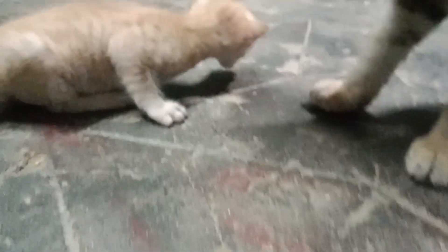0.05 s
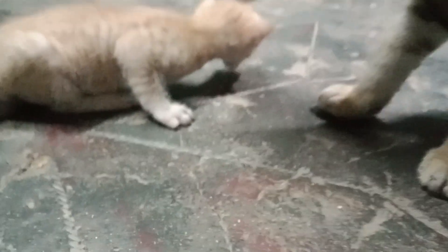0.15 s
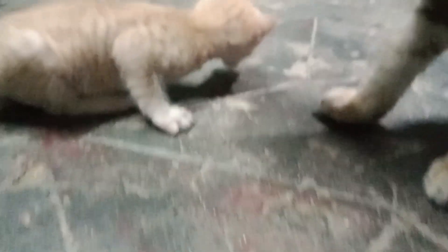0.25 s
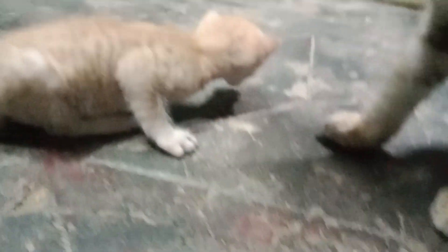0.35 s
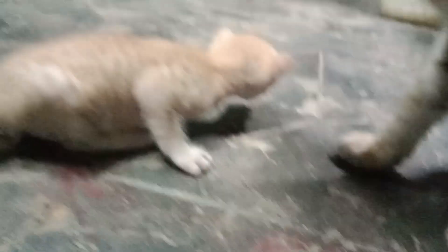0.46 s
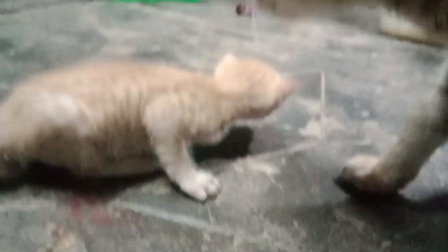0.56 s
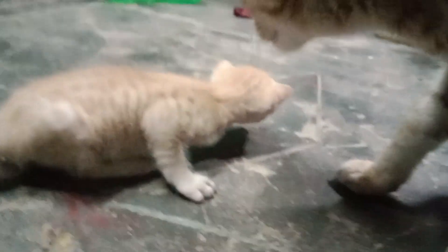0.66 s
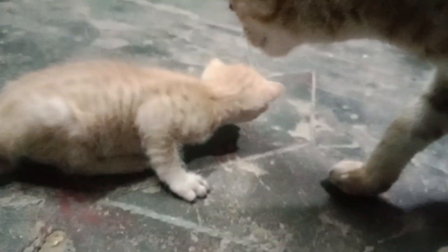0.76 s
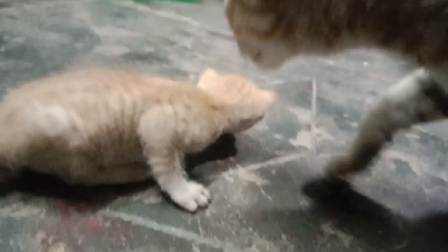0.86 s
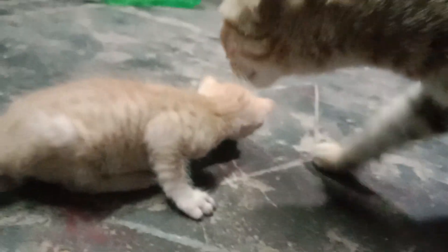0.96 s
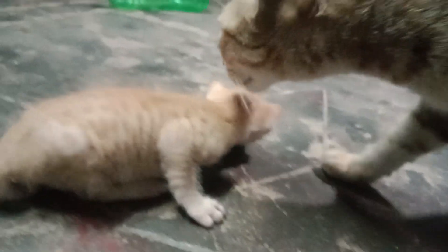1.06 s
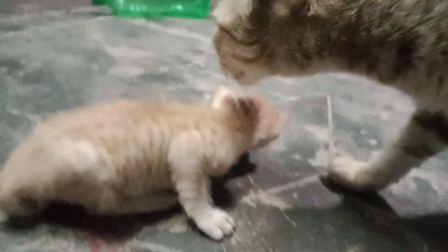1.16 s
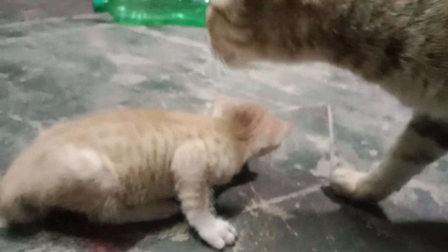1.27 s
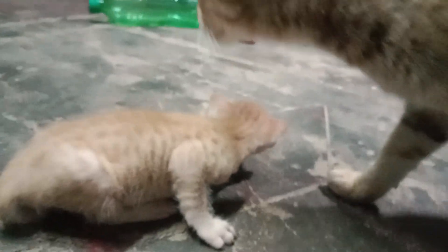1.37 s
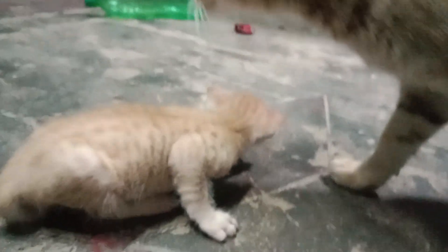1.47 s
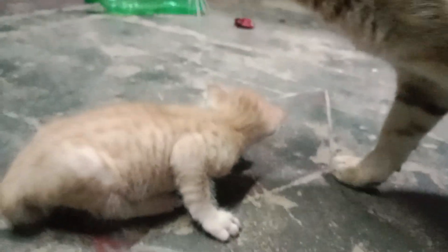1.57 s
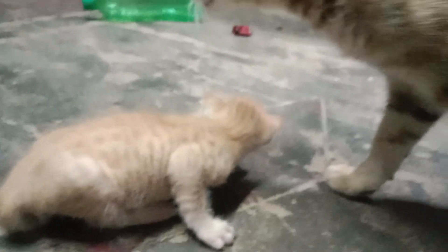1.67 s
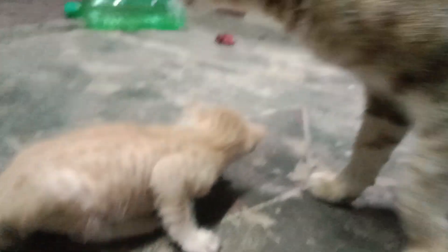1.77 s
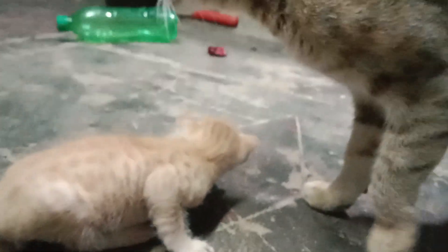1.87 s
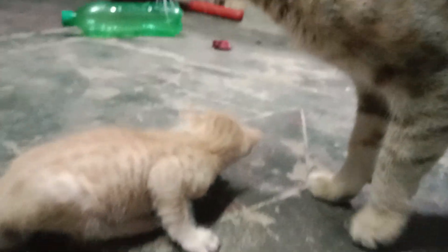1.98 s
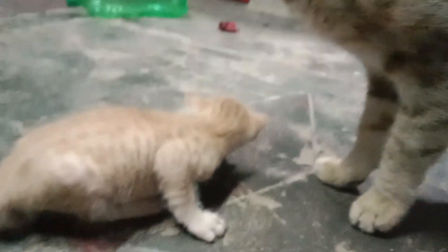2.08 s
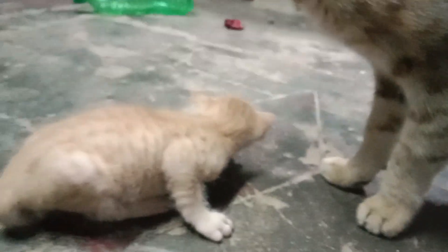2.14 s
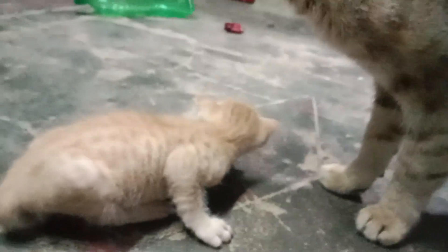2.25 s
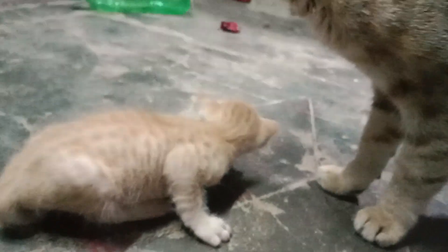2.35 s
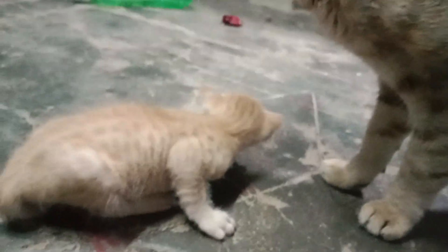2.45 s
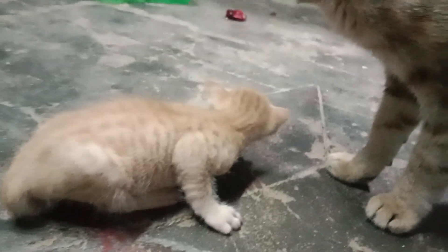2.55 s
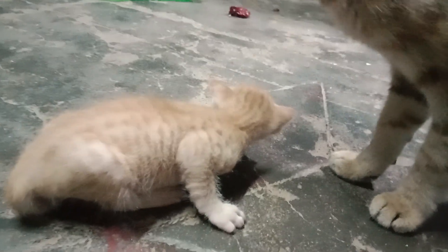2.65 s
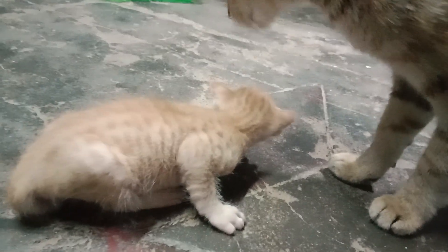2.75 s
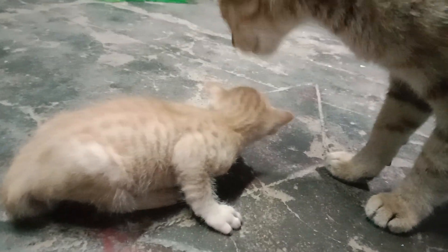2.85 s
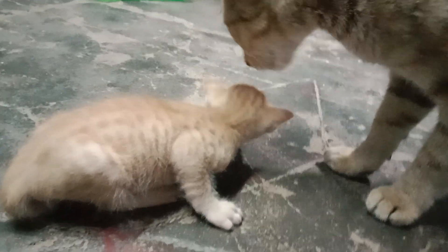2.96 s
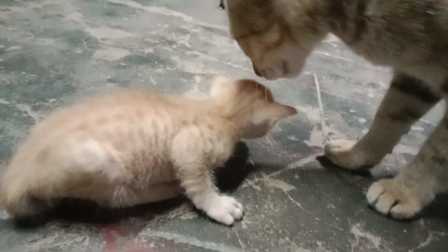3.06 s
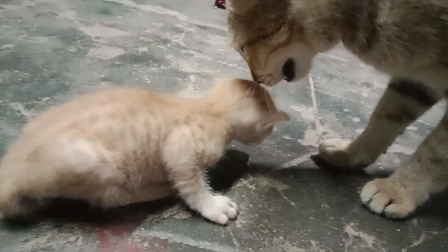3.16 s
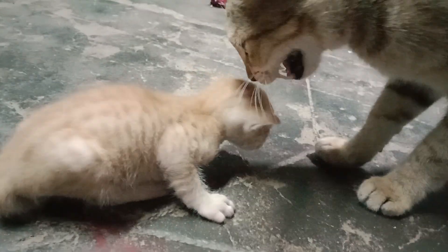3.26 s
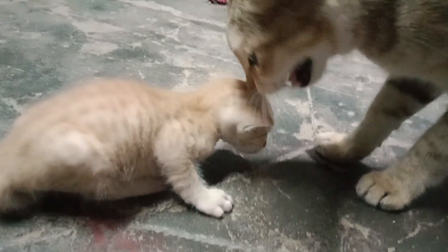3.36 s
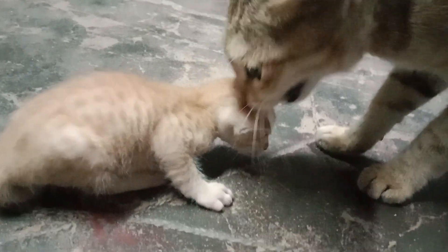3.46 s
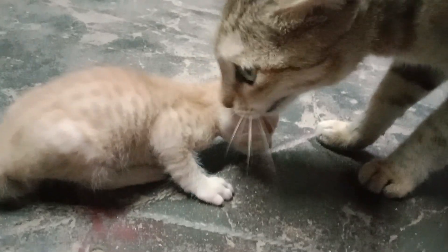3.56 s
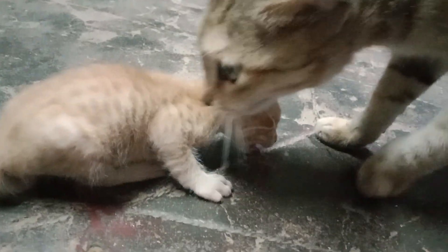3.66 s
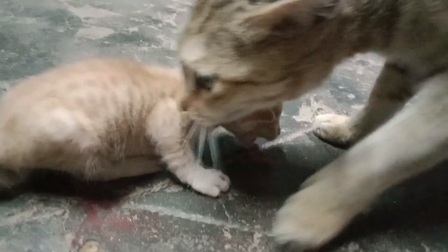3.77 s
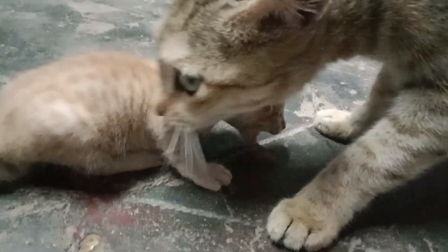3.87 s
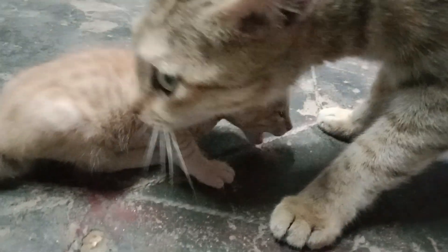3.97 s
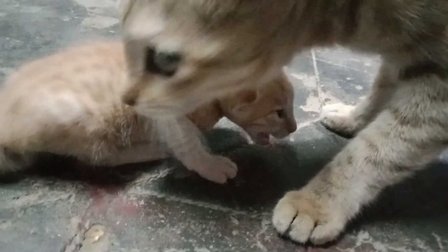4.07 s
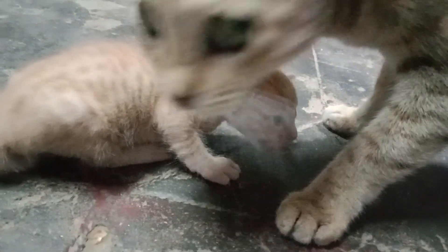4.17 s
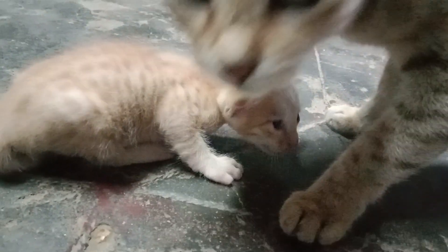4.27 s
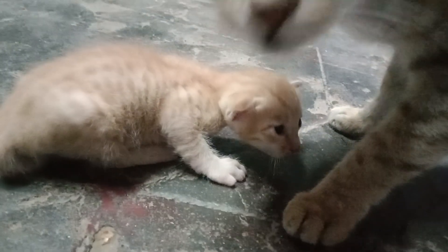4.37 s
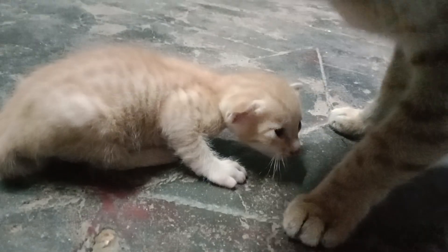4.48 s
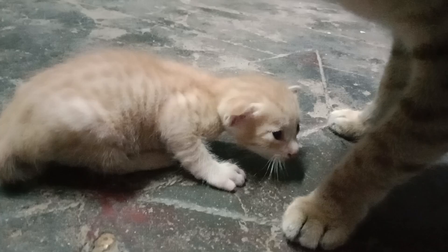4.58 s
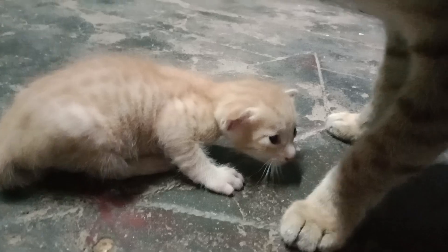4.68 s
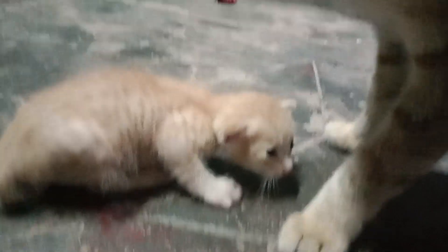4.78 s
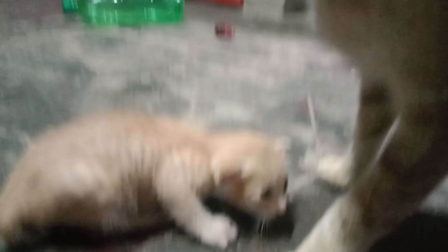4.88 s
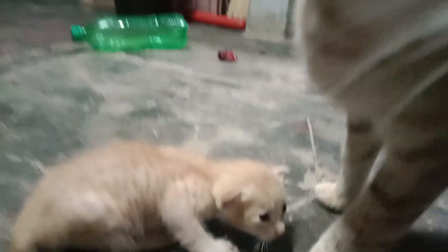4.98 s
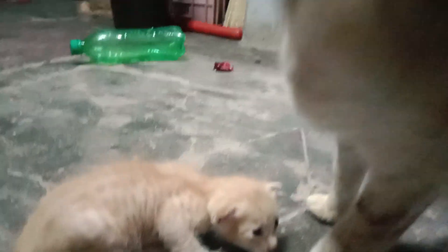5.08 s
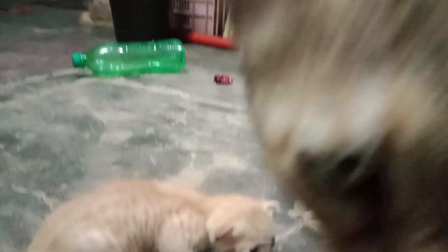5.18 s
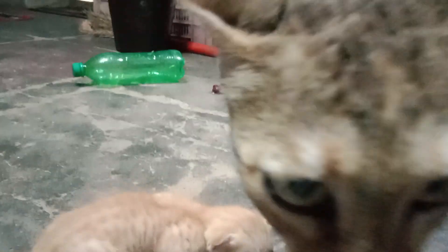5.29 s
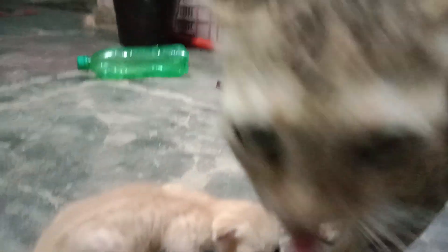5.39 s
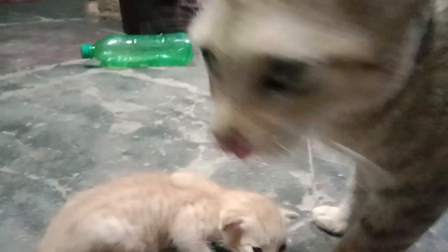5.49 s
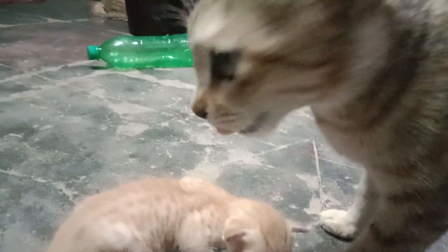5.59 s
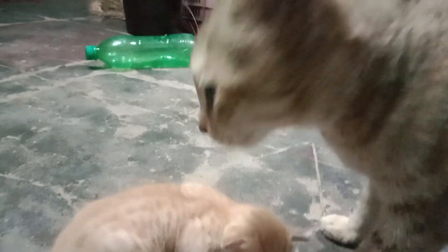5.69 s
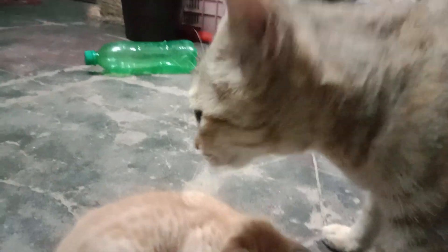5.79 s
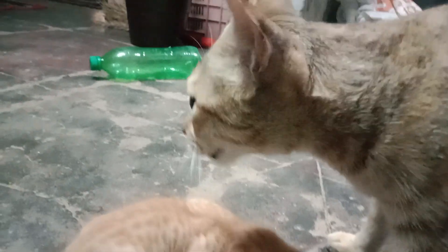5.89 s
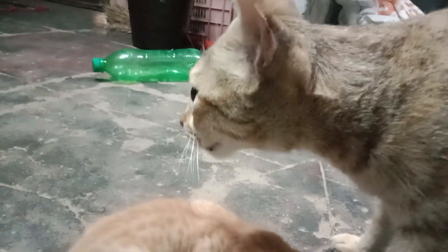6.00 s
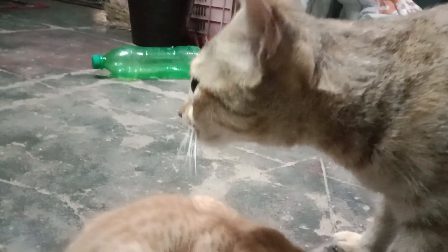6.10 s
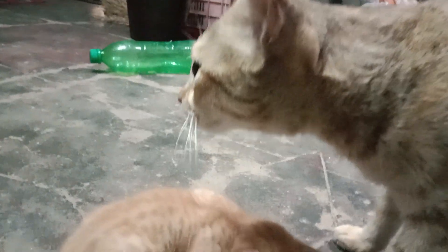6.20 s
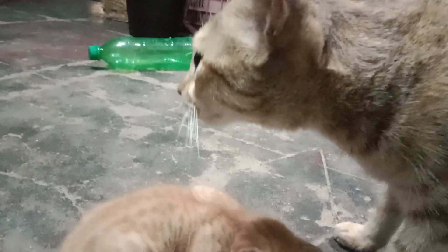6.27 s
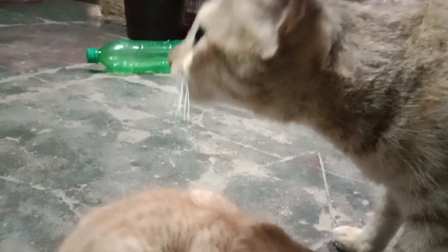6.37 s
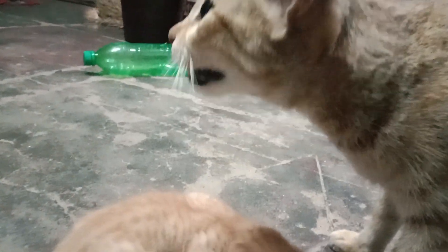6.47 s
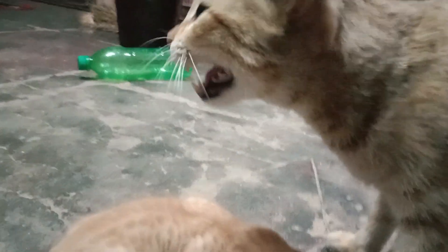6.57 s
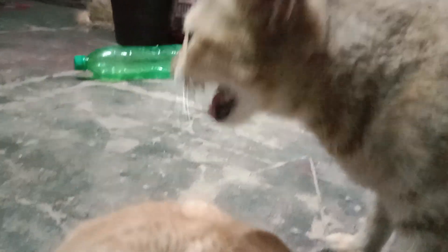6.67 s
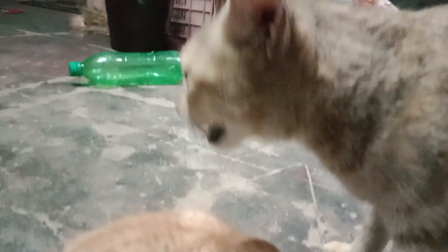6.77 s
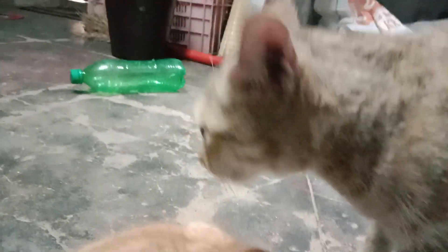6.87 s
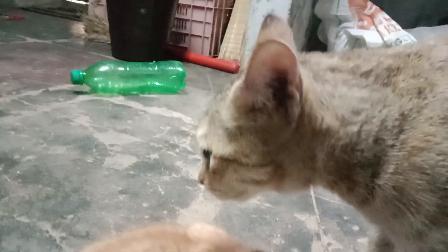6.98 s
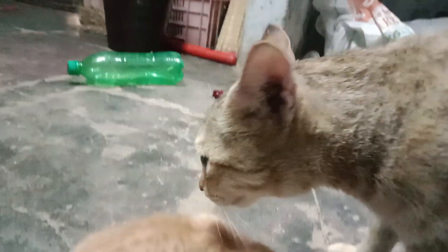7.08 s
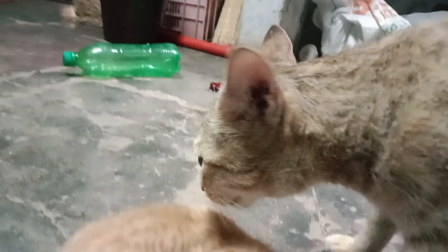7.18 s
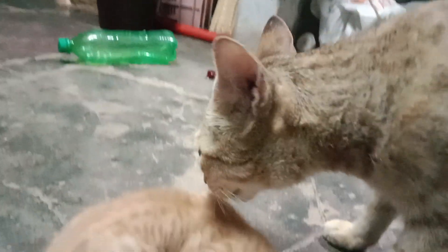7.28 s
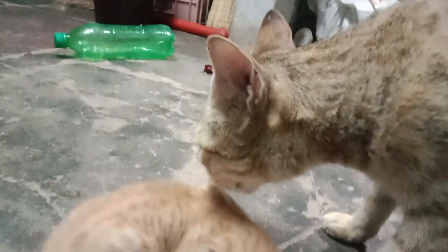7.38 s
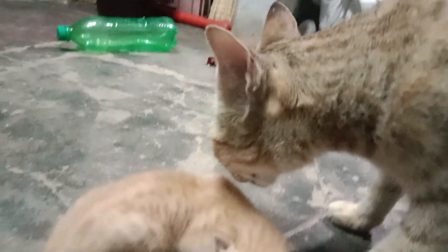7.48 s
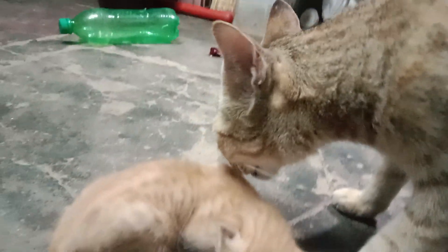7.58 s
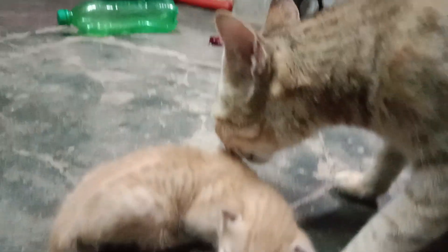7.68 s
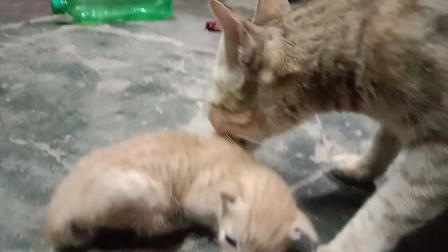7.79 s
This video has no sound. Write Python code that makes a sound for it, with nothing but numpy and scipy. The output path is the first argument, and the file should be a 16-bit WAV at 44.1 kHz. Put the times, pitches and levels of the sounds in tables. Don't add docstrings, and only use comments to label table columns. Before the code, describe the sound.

A tiny kitten gives six thin, piercing mews in a hard-walled room while its mother snorts, smacks her lips and answers twice, a small engine passing outside.

```python
import sys
import numpy as np
from scipy import signal
from scipy.fft import rfft, irfft, next_fast_len
from scipy.io import wavfile
from scipy.ndimage import uniform_filter1d, minimum_filter1d, map_coordinates

SR = 44100
rng = np.random.default_rng(int(sys.argv[2]) if len(sys.argv) > 2 else 0)


def dump(signal):
    limited = np.clip(np.atleast_2d(signal).T, -1, 1)
    pcm = np.round(limited * 32767).astype(np.int16)
    wavfile.write(sys.argv[1], SR, pcm)


def magnitude_from_level(level_db):
    exponent = np.asarray(level_db, float) / 20
    return 10 ** exponent


N = 345744
TOP_HZ = 15600

# (time [s], effort [dB], mouth resonance [Hz], brightness [dB])
MEW_1 = [(0.0, -64.5, 2970, -3), (0.071, -52.5, 2710, 4), (0.117, -47.5, 2620, -7),
         (0.164, -49, 2500, -2.5), (0.207, -37.5, 2150, -3.5), (0.278, -46, 1930, 8),
         (0.38, -46.5, 1680, 5), (0.58, -57.5, 1360, 3), (0.62, -71, 1293, 0)]
MEW_2 = [(1.178, -73.5, 4280, -12), (1.22, -58.5, 3630, 0), (1.31, -51, 3110, 2), (1.381, -42, 2870, 3.5),
         (1.492, -40.5, 2504, 0.5), (1.537, -45.5, 2433, -2), (1.73, -50.5, 1615, -3),
         (1.861, -69.5, 1790, -5), (1.93, -69.5, 1660, 0)]
MEW_3 = [(2.29, -68.5, 3550, 0), (2.392, -52.5, 3340, 0), (2.429, -53.5, 2790, 0), (2.48, -45.5, 3380, 0),
         (2.541, -45, 2866, 0), (2.668, -43.5, 2544, 0), (2.78, -51.5, 1960, 0), (2.88, -57.5, 1760, 0),
         (2.95, -66.5, 1750, 0)]
MEW_4 = [(3.698, -39.5, 4220, 0), (3.778, -42, 3100, -2), (3.9, -37.5, 3350, 1), (3.989, -35, 3020, -5.5),
         (4.216, -41.5, 2093, -1.5), (4.221, -41, 1910, -5.5), (4.297, -45.5, 1760, 0),
         (4.314, -45.5, 1708, -6.5), (4.37, -54, 1440, -2)]
MEW_5 = [(5.359, -69, 1544, -10.5), (5.44, -38.5, 2860, -1.5), (5.499, -30.5, 3090, 0.5),
         (5.6, -30.5, 3040, 0), (5.679, -34.5, 2657, 2), (5.772, -41, 2254, 9), (5.778, -42, 2000, 7.5),
         (5.875, -43.5, 1560, -9), (5.98, -77.5, 1590, -11.5)]
MEW_6 = [(6.602, -80, 3800, -6), (6.629, -60.5, 1866, 5), (6.71, -34.5, 2466, 1.5), (6.779, -25, 2577, 1),
         (6.881, -33.5, 2537, 3), (7.02, -40.5, 2125, 3), (7.027, -38.5, 1800, -8), (7.109, -47, 1434, -9),
         (7.199, -77.5, 1740, -2)]
# (time [s], pitch [Hz])
MEW_PITCH = [
    [(0.0, 980), (0.052, 1207), (0.098, 1290), (0.148, 1309), (0.21, 1212), (0.284, 1108), (0.394, 1188),
     (0.564, 1151), (0.62, 1083)],
    [(1.178, 862), (1.218, 1051), (1.308, 1391), (1.372, 1359), (1.48, 1257), (1.55, 1148), (1.62, 1121),
     (1.8, 963.5), (1.93, 739)],
    [(2.29, 823.5), (2.314, 938), (2.41, 1242), (2.49, 1342), (2.59, 1269), (2.64, 1163), (2.78, 1012),
     (2.87, 909), (2.95, 807)],
    [(3.698, 1017), (3.744, 1155), (3.79, 1330), (3.832, 1358), (3.924, 1362), (3.996, 1324), (4.09, 1200),
     (4.152, 1146), (4.216, 1015)],
    [(5.359, 821.6), (5.399, 1085), (5.443, 1279), (5.485, 1357), (5.54, 1366), (5.583, 1386),
     (5.679, 1292), (5.75, 1143), (5.773, 1103)],
    [(6.602, 797), (6.646, 1060), (6.708, 1357), (6.726, 1403), (6.826, 1371), (6.882, 1321), (6.94, 1195),
     (6.976, 1137), (7.02, 1075)],
]
# (time [s], pitch [Hz])
BROKEN_PITCH = [
    [(4.22, 1113), (4.264, 1057), (4.303, 988), (4.307, 880), (4.37, 787.5)],
    [(5.778, 1222), (5.838, 1174), (5.88, 1100), (5.91, 963), (5.98, 790)],
    [(7.026, 1163), (7.068, 1151), (7.112, 1075), (7.15, 919), (7.2, 748)],
]
UPPER_DB = -0.5, -2.5, 4.5, 5.5, -4, -4.5
TOP_DB = -54, -51, -48.5, -53.5, -56, -53
CHEST_DB = 0.072, 0.09, 3.1, 2.1, 1.3, 1
TOP_TILT_DB = -0.5, 0, 0.5, 0, -3.5, 8
# (frequency [Hz], level [dB])
KITTEN_MOUTH = [(2000, 4), (4200, 0), (4700, -3), (5400, 2), (7000, -3), (8500, -20), (10000, -24)]
# (frequency [Hz], level [dB])
KITTEN_TOP = [(6500, -41), (8000, -10), (10000, -14.5), (12000, -8.5), (14000, -17.5), (15600, -17.5)]
# (time [s], jump [dB], held [s])
CATCHES = [(0.081, 5.5, 0.0087), (0.115, 7, 0.018), (1.223, 6.5, 0.022), (3.777, 7.5, 0.05),
           (4.31, 7.5, 0.014), (5.458, 8, 0.023), (5.491, 8.5, 0.014), (6.745, 5, 0.021)]
# (time [s], half length [s], depth [dB])
DOUBLING = [(5.555, .035, -41)]
# (time [s], half length [s], level [dB])
AIR_PUFFS = [(5.42, 0.04, 8.5), (5.53, .035, 7.5), (6.9, .06, 4), (3.74, .04, 5.5), (1.26, .05, 2.5)]

# (time [s], pitch [Hz], throat [dB], open mouth [dB], jaw resonance [Hz])
MOTHER_CALLS = [
    [(3.13, 207.2, -50, -95, 870), (3.2, 229.8, -38, -95.5, 1003), (3.305, 235.3, -34, -66, 1006),
     (3.323, 238.2, -34.5, -34.5, 1136), (3.455, 279.1, -29, -34, 1250), (3.546, 266.5, -32.5, -36.5, 1180),
     (3.6, 251.5, -31.5, -39, 1010), (3.69, 235.8, -32.5, -41.5, 950), (3.75, 165, -38.5, -46, 800)],
    [(6.6, 240.5, -75.5, -75, 790), (6.66, 253.8, -57, -35, 800), (6.73, 266.9, -48.5, -30, 810),
     (6.79, 254, -64.5, -28, 760), (6.81, 255.3, -51.5, -50, 527), (6.88, 219.8, -74.5, -76, 447)],
]
# (frequency [Hz], level [dB])
THROAT = [(150, -40), (260, -16), (350, 3), (440, -7), (505, -2), (560, -16), (765, -30), (800, -8),
          (1150, -26), (1600, -18), (2200, -20), (2600, -40)]
# (frequency [Hz], level [dB per Hz])
MOTHER_MOUTH = [
    [(1180, -67), (2000, -10.5), (3750, -15.5), (4050, -19), (5100, 4.5), (5760, -16.5), (7910, -6), (8620, -34.5), (10200, -40.5), (14600, -14), (15600, -27.5)],
    [(1180, -56), (2000, -42), (2730, -11.5), (3560, -4.5), (3780, -6.5), (5240, 5), (5810, -7.5), (10500, -11), (12200, -27.5), (13600, -15), (14600, -13.5), (15600, -26)],
]
# (frequency [Hz], level [dB per Hz])
HALF_OPEN = [(1200, -21.5), (2000, -7), (3000, 4), (4500, -5.5), (6000, -8.5), (8500, -20), (15600, -38.5)]
# (time [s], level [dB])
SNORT = [(0.38, -76), (0.44, -50), (0.484, -39), (0.576, -43.5), (0.74, -89.5)]
# (frequency [Hz], level [dB per Hz])
NOSE = [(88, -37.5), (150, -3.5), (381, -10), (428, -7.5), (683, -5.5), (896, -29), (1150, -6.5),
        (1490, -21.5), (1640, -19.5), (3930, -21.5), (6260, -2), (7450, -17), (15600, -19.5)]
# (time [s], peak level [dB], t60 [s], rise [s])
SMACKS = [(0.662, -42, 0.039, 0.0044), (0.7729, -78, 0.02, 0.011), (1.8609, -43.5, 0.23, 0.026),
          (2.0148, -21.5, 0.027, 0.0077), (2.881, -39, 0.03, 0.0091), (2.9598, -79.5, 0.065, 0.0068),
          (3.0712, -35.5, 0.073, 0.0053), (3.1585, -20, 0.038, 0.008), (3.2476, -83.5, 0.052, 0.008),
          (3.2663, -70, 0.071, 0.008), (3.306, -60.5, 0.065, 0.007), (5.953, -35.5, 0.27, 0.022),
          (5.969, -24.5, 0.02, 0.004)]
# (frequency [Hz], level [dB])
LIPS = [(2500, -64.5), (4500, -22.5), (6500, -16), (10000, -11), (15600, 3.5)]

# (time [s], level [dB])
VEHICLE = [(0.0, -53), (0.52, -59), (1.18, -75), (1.37, -57.5), (1.68, -51), (1.8, -57), (2.51, -41),
           (3.2, -41), (3.35, -35), (4.3, -37.5), (4.8, -36.5), (4.88, -42), (5.26, -56.5), (5.81, -54.5),
           (6.13, -64.5), (7.1, -60), (7.34, -72.5), (7.84, -70)]
# (time [s], firing rate [1/s])
FIRING = [(1.3, 27), (2.0, 26), (4.0, 26.2), (4.8, 26), (5.3, 25.8)]
# (firing order [1], level [dB])
EXHAUST = [(1, -34), (2, -8.5), (3, -9), (4, -2.5), (5, -2), (6, -9.5), (7, 2), (8, -2), (9, -16.5),
           (10, -14), (11, -15), (14, -18)]
# (time [s], level [dB])
BOOM = [(3.6, -5), (4.15, 0), (4.33, 8), (4.5, 3), (4.8, -0.5), (4.9, -14)]
# (time [s], share [0-1])
THROTTLE = [(1.2, .1), (2.3, .3), (2.9, .45), (3.4, .75), (4.8, .9), (4.84, .1), (5.3, .02)]
# (frequency [Hz], level [dB per Hz])
DRONE_LATE = [(25, -31), (60, -11.5), (120, -0.5), (200, 2), (290, -1.5), (420, -34)]
# (frequency [Hz], level [dB per Hz])
DRONE_EARLY = [(25, -24.5), (60, -19), (130, 4), (190, 0.5), (260, -27), (420, -46.5)]
# (frequency [Hz], level [dB per Hz])
BODYWORK = [(140, -29), (230, -6), (328, -3.5), (361, -4), (635, -11), (900, -22.5), (1170, -47),
            (1980, -120)]
# (frequency [Hz], level [dB per Hz])
ROAD = [(600, -13.5), (950, -1.5), (1500, 1), (2200, -6), (3400, -6.5), (4300, -17.5), (5200, -7),
        (7000, -15), (10300, -31.5), (11000, -61.5)]
# (frequency [Hz], level [dB per Hz])
GRIT = [(10000, -38.5), (11000, -6.5), (15600, 1.5)]
# (time [s], pitch [Hz], level [dB])
SQUEAL = [(4.82, 1430, -57), (4.876, 1464, -47), (5.146, 1420, -57.5), (5.192, 1410, -68),
          (5.248, 1464, -66), (5.35, 1484, -67)]
# (frequency ratio [1], level [dB], extra fall [dB/s])
BRAKE_MODES = [(1, 0, 0), (1.8, -12, 35), (2.19, -7, 30), (2.87, -14, 50), (3.45, -12, 40)]
# (time [s], level [dB])
PADS = [(4.78, -68), (4.84, -57), (4.96, -56), (5.06, -54), (5.09, -60), (5.2, -64.5), (5.33, -72)]
# (frequency [Hz], level [dB per Hz])
PAD_BANDS = [(4300, -31.5), (5200, -3), (6100, -7.5), (6900, 0.5), (7500, -10), (8200, -4.5), (10200, -20),
             (11000, -63)]
# (time [s], pitch [Hz], level [dB])
MOAN = [(4.98, 212, -65), (5.06, 204.8, -40.5), (5.16, 209, -46), (5.24, 207, -74)]
# (time [s], frequency [Hz], level [dB], t60 [s])
FAR_TONES = [(1.641, 516, -71.5, 0.6), (1.719, 320, -61, 0.19), (1.83, 320, -52, 0.16), (1.87, 540, -53, 0.17),
             (2.659, 270, -50, 0.36), (2.76, 515, -52, 0.41), (2.78, 500, -55, 0.3), (4.98, 420, -47.5, 0.25),
             (5.228, 2900, -61, 0.23), (6.051, 1060, -58.5, 0.19), (6.0, 1500, -54.5, 0.18),
             (5.2, 2200, -58, .15), (7.19, 5550, -65.5, 0.19), (5.2, 8000, -62, 0.2), (5.0, 300, -43, 0.31),
             (4.5, 250, -43.5, .3), (3.3, 240, -44, 0.3)]
# (frequency [Hz], level [dB per Hz])
QUIET = [(15, -47), (40, -28.5), (60, 1.5), (144, -8.5), (253, -23), (458, -15.5), (1180, -17.5),
         (1270, -10.5), (2070, -29), (3100, -27), (3850, -34), (8500, -25.5), (9500, -44.5), (15600, -49)]
# (frequency [Hz], t60 [s])
WALLS = [(300, 0.077), (2500, 0.19), (10000, 0.059)]
# (time [s], level [dB])
WALL_SHARE = [(0.3, -7.5), (1.5, -7), (2.6, -7), (4.0, -9), (5.6, -10.5), (6.9, -13)]


def unit(x):
    return x / np.sqrt(np.mean(x ** 2) + 1e-20)


def along(points, hz):
    f, v = np.transpose(points)
    return np.interp(np.log(hz + 1), np.log(f + 1), v)


def track(rows, t):
    return np.interp(t, *np.transpose(rows))


def curves(rows):
    s, *cols = np.transpose(rows)
    span = np.arange(max(round(s[0] * SR), 0), min(round(s[-1] * SR), N))
    fade = np.clip(np.minimum(span - span[0], span[-1] - span) / (.008 * SR), 0, 1)
    return span, fade, [np.interp(span / SR, s, c) for c in cols]


def hump(t, centre, half):
    return np.clip(1 - ((t - centre) / half) ** 2, 0, 1)


def noise(size):
    return rng.standard_normal(size)


def wobble(rate, size):
    return map_coordinates(noise(size // 100 + 4), [np.arange(size) * min(rate, 400) / SR])


def coloured(x, spectrum):
    m = next_fast_len(len(x) + 8192)
    gain = magnitude_from_level(along(spectrum, np.fft.rfftfreq(m, 1 / SR)))
    return unit(irfft(rfft(x, m) * gain, m)[:len(x)])


def patchy(size, patchy_db, source=None):
    x = noise(size + 512) if source is None else np.pad(source, (0, 512))
    z = signal.stft(x, nperseg=512)[2]
    field = uniform_filter1d(noise(z.shape), size=6, axis=0)
    field = uniform_filter1d(field, size=10, axis=1)
    return signal.istft(z * magnitude_from_level(patchy_db * unit(field)), nperseg=512)[1][:size]


def kitten():
    mews = MEW_1, MEW_2, MEW_3, MEW_4, MEW_5, MEW_6
    tails = [[], [], []] + BROKEN_PITCH
    top_grows = 0.6, 0.91, 0.67, 0.37, 1, 0.48
    edge_dbs = 1.5, 1, -1.5, -7.5, -1.5, -9
    breaks_s, glide_s = [4.218, 4.305, 5.775, 7.023], .025
    out = np.zeros(N)
    for rows, bright_db, top_db, grows, chest_db, edge_db, tilt_db, tune, tail in zip(
            mews, UPPER_DB, TOP_DB, top_grows, CHEST_DB, edge_dbs, TOP_TILT_DB, MEW_PITCH, tails):
        span, fade, (effort_db, mouth_hz, shine_db) = curves(rows)
        t, size = span / SR, len(span)
        held_db = -sum(db * np.exp(np.minimum(t - s, 0) / hold) * np.clip((s - t) / 0.003, 0, 1)
                       for s, db, hold in CATCHES)
        effort_db = effort_db + held_db

        hz = track(tune + tail, t)
        parts = np.split(hz, np.searchsorted(t, breaks_s))
        hz = np.concatenate([uniform_filter1d(p, int(glide_s * SR), mode='nearest')
                             for p in parts if len(p)])
        climb = np.clip(uniform_filter1d(np.gradient(np.log2(hz)) * SR, size=400), 0, 8)
        climb = climb * (np.arange(size) < hz.argmax())
        hz *= 1 + 0.003 * wobble(50, size) + 0.003 * wobble(160, size)
        phase = 2 * np.pi * np.cumsum(hz) / SR

        x = np.arange(1, 4)[:, None] * uniform_filter1d(hz, size=400) / mouth_hz
        low = magnitude_from_level(effort_db + np.array([[0], [0], [-1.5]])) / np.hypot(1 - x ** 2, x / 15)
        low[0] *= magnitude_from_level(chest_db - 0.28 * held_db)
        low[2] *= magnitude_from_level(.6 * shine_db)
        voice = sum(g * magnitude_from_level(1.5 * wobble(34.84, size)) * np.sin(k * phase + k * k)
                    for k, g in enumerate(low, start=1))

        bright_db = np.maximum(bright_db + 59.5 * np.log2(hz / 1326), -33.5)
        shut_db = 10 * np.minimum(np.log2(mouth_hz / 2250), 0)
        upper_db = effort_db + shine_db + 0.1 * held_db + bright_db + 0.1 * climb + shut_db
        top_db = top_db + grows * (effort_db + 40) + .2 * bright_db
        for s, db in zip(breaks_s[2:], (-10.5, 3.5)):
            top_db = top_db + db * (abs(t - s - .15) < .15)
        for k in range(4, 20):
            part_hz = k * hz
            edge = edge_db * np.clip((part_hz - 12000) / 600 + .5, 0, 1)
            level = magnitude_from_level(upper_db + along(KITTEN_MOUTH, part_hz) + edge)
            tilt = tilt_db * np.log2(part_hz / 11000)
            level += magnitude_from_level(top_db + tilt + along(KITTEN_TOP, part_hz) + 5 * wobble(16, size))
            level *= magnitude_from_level(2.3 * wobble(33.6, size) + 2.1 * wobble(140, size)) * (part_hz < TOP_HZ)
            voice += level * np.sin(k * phase + k * k)

        depth = sum(magnitude_from_level(db) * hump(t, s, half) for s, half, db in DOUBLING)
        voice *= 1 + 2 * depth * np.cos(phase / 2 + 2.0 * wobble(80, size))

        leak = coloured(noise(size) * (1 + np.cos(phase)), [(1200, -46.5)] + KITTEN_MOUTH)
        leak *= magnitude_from_level(upper_db - 14.5) * (1 + magnitude_from_level(1.5) * depth / magnitude_from_level(DOUBLING[0][2]))
        fizz = coloured(noise(size) * (1 + np.cos(phase)), KITTEN_TOP)
        puff_db = sum(db * hump(t, s, half) for s, half, db in AIR_PUFFS)
        fizz *= magnitude_from_level(top_db - 9 + puff_db + 3 * climb + 4 * wobble(19, size))
        out[span] += fade * (np.sqrt(2) * voice + leak + fizz)
    return out


def mother():
    out = np.zeros(N)
    hoarseness = .12, .4
    for rows, hoarse, (opening, closing) in zip(MOTHER_CALLS, hoarseness,
                                                (MOTHER_MOUTH, (HALF_OPEN, HALF_OPEN))):
        span, fade, (hz, throat_db, mouth_db, jaw_hz) = curves(rows)
        size = len(span)
        rough = hoarse * np.clip((mouth_db + 60) / 25, .1, 1) ** 2
        jitter = .02 * rough * wobble(200, size) + .005 * wobble(50, size)
        cycles = np.cumsum(hz * (1 + jitter)) / SR

        thin_db = 9.5 * np.clip((mouth_db + 41) / 6, 0, 1)
        low = np.zeros(size)
        for k in range(1, 11):
            throat = magnitude_from_level(along(THROAT, k * hz) - thin_db * (k < 3) + 2.5 * wobble(18, size))
            jaw = magnitude_from_level(2 * wobble(30, size)) / (1 + ((k * hz - jaw_hz) / 100) ** 2) ** 1.5
            low += (throat + jaw) * np.cos(2 * np.pi * k * cycles)

        pulses = unit(np.diff(np.floor(cycles), prepend=0) * magnitude_from_level(2 * wobble(200, size)))
        smear = np.cos(np.pi / 2 * np.arange(60) ** 2 / 60)
        pulses = unit(np.convolve(pulses, smear, 'same'))
        gated = unit(noise(size) * np.exp(-4 * (cycles % 1)))
        source = np.sqrt(1 - rough) * pulses + np.sqrt(rough) * gated * magnitude_from_level(3 * wobble(45, size))
        source = patchy(size, patchy_db=2.2, source=source)
        late = np.clip((span - span[0]) / SR / 0.2 - 1.4, 0, 1)
        high = (1 - late) * coloured(source, opening) + late * coloured(source, closing)
        out[span] += fade * (magnitude_from_level(throat_db) * low + magnitude_from_level(mouth_db) * high)
    return out


def snort():
    out = np.zeros(N)
    span, fade, (db,) = curves(SNORT)
    puff = coloured(patchy(len(span), patchy_db=1.5), NOSE)
    out[span] = fade * magnitude_from_level(db + 5.5 + 0.72 * wobble(92, len(span))) * puff
    return out


def smacks():
    out, t = np.zeros(N + SR), np.arange(SR // 5) / SR
    for s, db, t60, rise in SMACKS:
        top = [(hz, level - dull * t60) for (hz, level), dull in zip(LIPS[3:], (54, 130.5))]
        burst = coloured(noise(len(t)), LIPS[:3] + top)
        burst *= magnitude_from_level(-60 * t / max(t60, .005)) * np.clip(t / max(rise, .004), 0, 1)
        out[round(s * SR):][:len(t)] += magnitude_from_level(db - 6.0) * burst
    return out[:N]


def paw():
    start_s, tap_hz, tap_db, fall_s = 0.066, 1100, -41.5, 0.033
    t = np.clip(np.arange(N) / SR - start_s, 0, None)
    return magnitude_from_level(tap_db - 60 * np.minimum(t / fall_s, 4)) * np.sin(2 * np.pi * tap_hz * t)


def vehicle(lift):
    span, _, (engine_db,) = curves(VEHICLE)
    t, size = span / SR, len(span)
    cycles = np.cumsum(track(FIRING, t) * (1 + 0.00092 * wobble(1.8, size))) / SR
    orders = np.zeros(size)
    for k, db in EXHAUST:
        level = magnitude_from_level(db + track(BOOM, t) * (k in (7, 8)) + 3 * wobble(6, size))
        orders += .6 * level * np.sin(2 * np.pi * k * cycles + k * k)

    share = track(THROTTLE, t)
    near = np.interp(t, (2, 5), [0, 1])
    drone = near * coloured(patchy(size, patchy_db=2), DRONE_LATE)
    drone += (1 - near) * coloured(patchy(size, patchy_db=2.5), DRONE_EARLY)
    engine = np.sqrt(share) * orders + np.sqrt(1 - share) * drone

    beat = 1 + 0.13 * np.cos(2 * np.pi * cycles)
    body = coloured(patchy(size, patchy_db=1.5) * beat, BODYWORK)
    road = coloured(patchy(size, patchy_db=2.5) * beat, ROAD)
    road += magnitude_from_level(-62 + 24 * share + 7 * wobble(11, size)) * coloured(noise(size), GRIT)
    body_gain = magnitude_from_level(-10 + 12.5 * share ** 2 - 7.9 * (1 - near))
    road_gain = magnitude_from_level(-7.5 + 6.2 * share)
    out = np.zeros(N)
    out[span] = magnitude_from_level(engine_db) * (engine + body_gain * body + road_gain * road) + lift[span] * road
    return out


def brake():
    out = np.zeros(N)
    span, fade, (hz, db) = curves(SQUEAL)
    size = len(span)
    for ratio, level, fall in BRAKE_MODES:
        wavering_hz = hz + (14 + fall / 2) * wobble(50, size)
        tone = np.sin(2 * np.pi * ratio * np.cumsum(wavering_hz) / SR)
        mode_db = db + 3 + level - fall * (span - span[0]) / SR
        out[span] += fade * magnitude_from_level(mode_db + 5 * wobble(45, size)) * tone
    span, fade, (db,) = curves(PADS)
    rub = coloured(patchy(len(span), patchy_db=4), PAD_BANDS)
    out[span] += fade * magnitude_from_level(db + 2 * wobble(40, len(span))) * rub
    return out


def moan():
    out = np.zeros(N)
    span, fade, (hz, db) = curves(MOAN)
    tone = np.sin(2 * np.pi * np.cumsum(hz + 4 * wobble(40, len(span))) / SR)
    out[span] = fade * magnitude_from_level(db + 3 * wobble(25, len(span))) * tone
    return out


def far_tones():
    out, t = np.zeros(N + SR), np.arange(SR // 3) / SR
    for s, hz, db, t60 in FAR_TONES:
        tone = np.sin(2 * np.pi * np.cumsum(hz + (8 + .008 * hz) * wobble(40, len(t))) / SR)
        swell = 1 - np.exp(-(t / .03) ** 2)
        out[round(s * SR):][:len(t)] += magnitude_from_level(db + 9 - 60 * t / t60) * swell * tone
    return out[:N]


def walls(x):
    hz, t, z = signal.stft(noise(SR // 2), SR, nperseg=256)
    tail = signal.istft(z * magnitude_from_level(-60 * t / along(WALLS, hz)[:, None]), SR, nperseg=256)[1]
    return signal.fftconvolve(np.pad(x, (250, 0)), tail / np.linalg.norm(tail))[:N]


def quiet_room():
    return magnitude_from_level(-69 - 2.5) * coloured(patchy(N, patchy_db=4.0), QUIET)


def suppress(x, strength, floor_db):
    z = signal.stft(x, nperseg=1024, noverlap=768)[2]
    power = np.abs(z) ** 2 + 1e-20
    around = uniform_filter1d(uniform_filter1d(power, size=29, axis=1), size=7, axis=2)
    local = uniform_filter1d(power, size=3, axis=2)
    gain = np.sqrt(np.clip(1 - strength * np.abs(around / local), magnitude_from_level(2 * floor_db), 1))
    return signal.istft(z * gain, nperseg=1024, noverlap=768)[1][:, :N]


def limit(x):
    need = np.minimum(.63 / (np.abs(x) + 1e-9), 1)
    return x * uniform_filter1d(minimum_filter1d(need, size=600), size=300)


def scene():
    cats = kitten() + mother() + snort() + smacks() + paw()
    echoes = walls(cats * magnitude_from_level(track(WALL_SHARE, np.arange(N) / SR)))
    loud = np.sqrt(np.abs(uniform_filter1d(cats ** 2, int(0.048 * SR))))
    street = vehicle(lift=magnitude_from_level(-44) * loud ** 0.5) + brake() + moan()
    return (cats + echoes + street + far_tones() + quiet_room())[None]


def roll_off(x):
    return signal.sosfilt(signal.butter(12, 16500, fs=SR, output="sos"), x)


def record(dry):
    hz = np.fft.rfftfreq(N, 1 / SR)
    clean = limit(suppress(dry, strength=.012, floor_db=-15))
    mix = irfft(rfft(clean) * (hz < TOP_HZ), N)
    return roll_off(mix)


dry = scene()
out = record(dry)
dump(out)
```